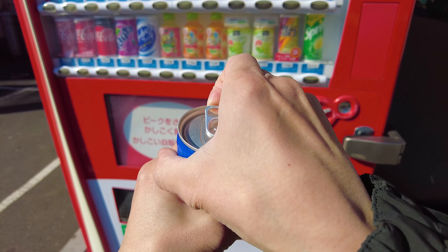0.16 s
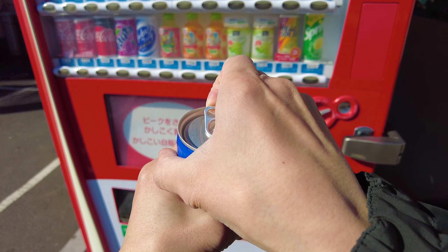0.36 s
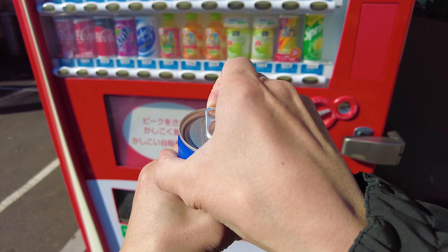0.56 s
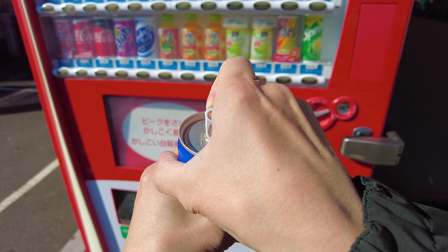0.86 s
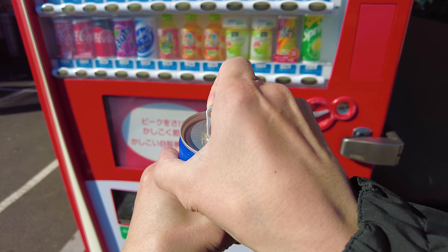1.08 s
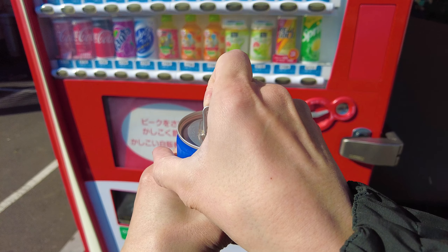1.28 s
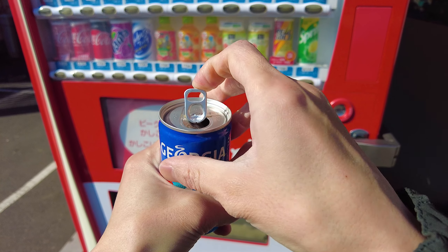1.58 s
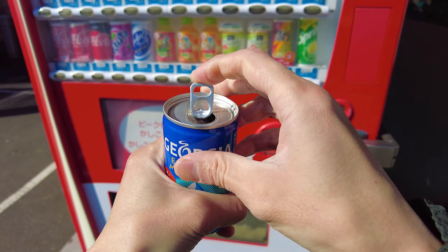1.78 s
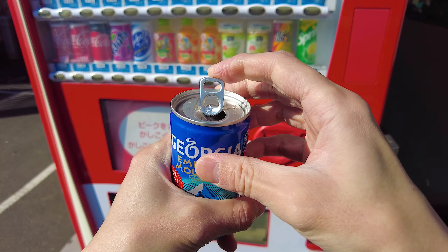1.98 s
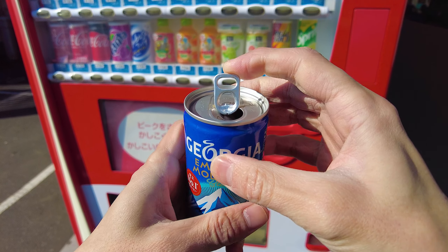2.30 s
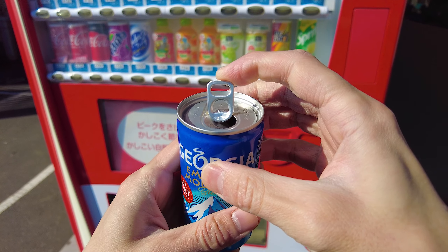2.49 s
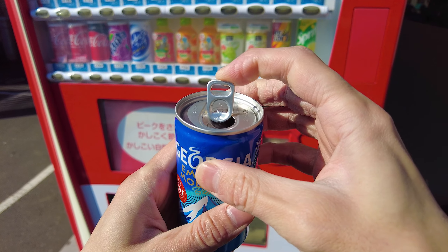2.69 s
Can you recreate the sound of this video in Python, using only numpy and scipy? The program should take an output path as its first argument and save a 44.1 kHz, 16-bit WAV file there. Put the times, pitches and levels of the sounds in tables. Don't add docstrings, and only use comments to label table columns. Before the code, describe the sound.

Close can opening: crisp seal crack, popping lid tear, tab clicks, over low wind rumble

```python
import sys
import numpy as np
from scipy import signal
from scipy.fft import rfft, irfft
from scipy.io import wavfile
from scipy.ndimage import uniform_filter1d

SR = 44100
rng = np.random.default_rng(int(sys.argv[2]) if len(sys.argv) > 2 else 0)


def gain_from_db(level_db):
    decades = np.asarray(level_db, float) / 20
    return 10 ** decades


def output_pcm(signal):
    pcm = np.clip(np.atleast_2d(signal).T, -1, 1) * 32767
    wavfile.write(sys.argv[1], SR, np.round(pcm).astype(np.int16))


N = 125685

# freq_hz, level_db (per Hz)
TRAFFIC_COLOUR = [(88, -40), (150, -13.5), (274, -6.5), (335, -20), (409, -8), (449, -12.5), (524, -15),
                  (6000, -44), (7800, -79.5), (13200, -120)]
# freq_hz, level_db (per Hz)
RUMBLE_COLOUR = [(8.8, -38.5), (15, 1.5), (32, 2.5), (44, -3), (85, -10), (172, -26.5), (200, -27),
                 (260, -56.5), (440, -120)]
# time_s, level_db
GUST_LEVELS = [(0.0, -43), (.12, -40), (.68, -44), (.78, -38), (1.1, -38), (1.2, -43), (1.35, -39),
               (1.45, -42), (1.6, -39), (1.75, -44), (2.1, -42), (2.32, -38), (2.85, -42)]
# centre_hz, width_hz, level_db
FAN = (262, 40, -67)
# freq_hz, level_db (per Hz)
HISS_COLOUR = [(3000, -6), (6000, 0), (10000, -4), (13500, -1), (15750, -2.5), (15950, -40.5)]
# freq_hz, likeness (0 to 1)
LIKENESS = [(60, 1), (200, 0.91), (350, .78), (550, 0.54), (1150, 0.53), (1800, .5), (3000, .2),
            (6000, 0.49), (15000, .55)]
# freq_hz, lead_rad
LEFT_LEAD = [(250, 0), (400, -.55), (700, -1.8), (1000, -3.1), (1140, -3.4), (1220, -6.2), (3000, -6.4),
             (16700, -6.2)]
TRAFFIC_DB, HISS_DB = -57, -75

# freq_hz, t60_s
YARD_DECAY = [(500, 0.28), (1500, 0.21), (4000, 0.89), (16000, 0.29)]
YARD_DB = -23

# start_s, length_s, level_db, centre_hz, width_octaves
RUBS = [(0.01, 0.51, -69.5, 7400, 0.91), (0.44, 0.58, -71, 2670, 1.9), (1.432, 0.22, -67.5, 2600, 2.5),
        (.706, .015, -58, 6000, 1.1), (1.138, .027, -58, 5500, 1.1), (1.709, 0.08, -75, 4350, 0.25),
        (1.707, 0.07, -77, 8000, 0.15), (1.842, 0.093, -74.5, 4200, 0.4), (2.137, .12, -62, 2900, 0.52),
        (1.9, 0.21, -72.5, 5100, 1.2), (1.3, 1.38, -67.5, 1350, 0.18), (1.44, 1.1, -69.5, 2100, 1.14)]
STROKE_S, SHORT, LONG = .3, SR // 2, SR + SR // 2

# start_s, hold_s, level_db, fade_db_per_s
PUFFS = [
    (0.726, 0.012, -34, 700.5),
    (0.748, 0.033, -54.5, 135),
    (1.166, 0.019, -36.5, 902),
    (1.189, 0.041, -50.5, 96),
]
# freq_hz, level_db (per Hz)
JET_COLOUR = [(350, -63), (600, -36), (1790, -0.5), (2800, -4.5), (4420, -1.5), (7180, -6), (14800, -7.5),
              (16500, -28)]
LEAK_COLOUR = [(350, -46.5), (600, -22.5), (1500, -3.5), (4000, -4.5), (7000, -7), (11000, -13),
               (15500, -12.5), (16500, -43)]
SIGH_COLOUR = [(350, -46.5), (600, -20), (1070, -0.5), (1380, -9), (5670, -9.5), (8480, -21.5),
               (15200, -21), (16500, -43)]

# start_s, peak_db, tearing_ms, left_minus_right_db
SEAL_CRACKS = [
    (0.7207, -6.5, .7, 0.5),
    (.7214, -16, .6, 1.5),
    (0.7235, -25, .8, 0),
    (.7262, -28, .8, 0),
    (0.7283, -19.5, 1.2, 0),
    (.768, -41.5, 1.5, -1),
    (1.0651, -45, .4, 0),
    (1.1358, -32.5, 1.2, -0.5),
    (1.138, -32, 1.2, 0.5),
    (2.208, -51.5, .8, 2),
]
LID_TEARS = [
    (1.1640, -21.5, 1.1, 1),
    (1.1672, -23, 1.8, 0.89),
    (1.1705, -4.5, 0.58, 0.98),
    (1.1716, -16.5, .8, 0.86),
    (1.181, -27.5, 1.2, 1),
    (1.182, -25.5, 2.5, 0.92),
]
TAB_FOLDS = [
    (1.433, -30, 1.2, 0.45),
    (1.4564, -13, 0.24, 1.5),
    (1.4576, -21, 0.95, 1.5),
    (1.4596, -22.5, 1.5, 2),
]
TAB_PRESSES = [
    (1.543, -27.5, .5, .7),
    (1.5440, -18, 0.73, .7),
    (1.5457, -26.5, 1.7, .7),
]
WALL_TAPS = [
    (2.1023, -9.5, 0.27, .1),
    (2.1065, -25.5, 1, .1),
]
HOLLOW_POPS = [
    (1.1555, -42, 2.5, 1),
    (1.1610, -37, 2.5, 1),
    (1.1702, -15, .3, 1),
    (1.1815, -33, .5, 1),
]
# freq_hz, level_db, t60_s
SEAL_MODES = [(1869, -14, .008), (2500, -19, .004), (3280, -10, .005), (4203, -2, 0.0052),
              (4616, -6.5, 0.0057), (5590, -1, 0.0047), (6600, -6, 0.0033), (7690, -2, 0.005),
              (9120, -4, 0.0052), (10530, -9, 0.0034), (12980, -7, .004)]
LID_MODES = [(490, -24, 0.0077), (1360, -8, 0.016), (1840, -6.5, .008), (2830, -12, .01), (3573, -5, .019),
             (4450, -5.5, 0.017), (5070, -2, 0.01), (5775, -8, 0.014), (6650, -10, 0.009),
             (7550, -12.5, .008), (9000, -6.5, .008), (10950, -17, 0.0069)]
TAB_MODES = [(1226, 0, 0.032), (1620, -9, 0.017), (1850, -4, 0.011), (2180, -4.5, 0.013),
             (2560, -16.5, 0.015), (2910, -11.5, 0.016), (3300, -11, 0.02), (3780, -14, 0.018),
             (4200, -20, .012), (4600, -15, 0.016), (5080, -22.5, 0.0098), (6370, -25.5, 0.014),
             (7580, -21, 0.0075)]
PRESSED_MODES = [(534, -14, 0.019), (1237, -1, 0.04), (1570, 0.5, 0.011), (2030, -2, 0.016),
                 (2680, -23, 0.013), (3020, -11, 0.025), (3650, -7, 0.014), (4200, -6, 0.016),
                 (4600, -2.5, 0.027), (5110, -10, 0.016), (5780, -19, 0.013), (7600, -11, 0.017),
                 (8770, -13, 0.014)]
WALL_MODES = [(606, -17, 0.027), (1163, -2, 0.033), (1502, 1.5, 0.024), (1766, -0.5, 0.025),
              (2055, -4, 0.019), (2850, -12.5, 0.023), (3240, -18, .012), (3770, -11, 0.024),
              (4290, -20, 0.014), (4540, -13.5, 0.02), (5520, -12.5, 0.0099), (6460, -16.5, 0.016)]
HOLLOW_MODES = [(1081, -.5, .024), (1190, -14, .02)]
# freq_hz, level_db (per Hz)
SEAL_SNAP = [(290, -50), (500, -26), (1300, -17), (4000, -2), (7590, -0.5), (13100, -6), (16800, -19)]
LID_SNAP = [(88, -35), (150, -14.5), (500, -10), (820, -27), (2520, -15.5), (4840, 1.5), (15500, -16),
            (16800, -32)]
TAB_SNAP = [(240, -39), (800, -31), (1610, -11), (4500, -15), (11500, -27), (13100, -23), (16800, -50)]
PRESS_SNAP = [(240, -32), (800, -39), (1800, -5), (4660, -9), (14600, -30), (16800, -53)]
WALL_SNAP = [(240, -50), (500, -17), (850, -7), (1850, -9), (2910, -14), (13500, -30), (16800, -61)]
POP_SNAP = [(60, -20), (150, -3), (500, -1), (1500, -12), (4000, -40)]
CRACK_LEVELS = [
    0,
    -1,
    -11,
    -9,
    -7.5,
    -17,
]
# freq_hz, side_minus_mid_db
WIDTH = [(60, -29.5), (300, -14.5), (850, -4), (1400, -15.5), (3000, -9), (8000, -7), (15000, -3.5)]
SCATTER, APART = .32, .55
THIN_HZ = 420
SHADE_HZ, SHADE_Q = 810, 4.2
EDGE_HZ = 16700


def evened(x):
    return x / np.sqrt(np.mean(x ** 2) + 1e-20)


def read(points, hz):
    f, value = np.transpose(points)
    return np.interp(np.log(hz + 1), np.log(f + 1), value)


def band(table, fall_db=40):
    (low_hz, low_db), (high_hz, high_db) = table[0], table[-1]
    points = [(low_hz / 2, low_db - fall_db), *table, (high_hz * 1.2, high_db - fall_db)]
    return lambda hz: read(points, hz)


def causal(shape_db):
    hz = abs(np.fft.fftfreq(2048, 1 / SR))
    level = np.log(gain_from_db(np.maximum(shape_db(hz), -90)))
    return np.fft.ifft(np.exp(level - 1j * signal.hilbert(level).imag)).real[:1024]


def noise(shape_db, same, size, patchy_db, lead=lambda hz: 0 * hz, count=N):
    hop, hz = size // 4, np.fft.rfftfreq(size, 1 / SR)
    a, b, c, d, patches = rng.standard_normal((count // hop + 5, len(hz), 5)).T
    patches = uniform_filter1d(patches, size=8, axis=0)
    patches = evened(uniform_filter1d(patches, size=10, axis=1))
    alike = np.clip(same(hz), -1, 1)[:, None]
    shared, apart = a + 1j * b, c + 1j * d
    left = shared * np.exp(1j * lead(hz))[:, None]
    right = alike * shared + np.sqrt(1 - alike ** 2) * apart
    z = np.array([left, right]) * gain_from_db(shape_db(hz)[:, None] + patchy_db * patches)
    return evened(signal.istft(z, nperseg=size, noverlap=size - hop)[1][:, :count])


def street():
    same, lead = lambda hz: read(LIKENESS, hz), lambda hz: read(LEFT_LEAD, hz)
    traffic = gain_from_db(TRAFFIC_DB) * noise(band(TRAFFIC_COLOUR, 15), same, size=1024, patchy_db=2.0, lead=lead)
    fan_hz, fan_width_hz, fan_db = FAN
    fan_colour = lambda hz: -6 * np.minimum(((hz - fan_hz) / fan_width_hz) ** 2, 15)
    fan = gain_from_db(fan_db) * noise(fan_colour, same, size=2048, patchy_db=3.5, lead=lead)
    hiss = gain_from_db(HISS_DB) * noise(lambda hz: read(HISS_COLOUR, hz), same, size=256, patchy_db=1.6)
    gusts = gain_from_db(np.interp(np.arange(N) / SR, *np.transpose(GUST_LEVELS)))
    rumble = gusts * noise(band(RUMBLE_COLOUR), same, size=4096, patchy_db=2.5)
    return traffic + hiss + fan + rumble


def yard(x):
    taps = np.zeros((2, SR // 2))
    grid = np.arange(400, SR // 2 - 20, 20)
    at = grid + rng.integers(0, 20, (2, len(grid)))
    np.put_along_axis(taps, at, rng.choice([-1., 1.], at.shape), 1)
    hz, t, z = signal.stft(taps, SR, nperseg=256)
    fading = z * gain_from_db(-60 * t / read(YARD_DECAY, hz)[:, None])
    tail = signal.istft(fading, SR, nperseg=256)[1]
    return signal.fftconvolve(x[None], tail / np.linalg.norm(tail[0]), axes=1)[:, :N]


def rustle():
    out = np.zeros((2, N + LONG))
    for s, length, db, centre_hz, octaves in RUBS:
        span = LONG if length > STROKE_S else SHORT
        at = round(abs(s) * SR)
        progress = np.minimum(np.arange(span) / SR / length, 1)
        stroke = abs(np.sin(np.pi * progress ** 0.62)) ** 0.42
        colour = lambda hz: -6 * (np.log2((hz + 1) / centre_hz) / octaves) ** 2
        grain = noise(colour, lambda hz: 0.61 + 0 * hz, size=256, patchy_db=1.0, count=span)
        out[:, at:at + span] += gain_from_db(db) * stroke * grain
    return out[:, :N]


def air():
    t, out = np.arange(SHORT) / SR, np.zeros((2, N))
    colours = [JET_COLOUR, LEAK_COLOUR, JET_COLOUR, SIGH_COLOUR]
    for (s, hold, db, fade_db), colour in zip(PUFFS, colours):
        shape = np.minimum(t / 0.0012, 1) * gain_from_db(db - fade_db * np.maximum(t - hold, 0))
        rush = noise(band(colour), lambda hz: 0.56 + 0 * hz, size=256, patchy_db=2.0, count=SHORT)
        at = round(s * SR)
        out[:, at:at + SHORT] += shape * rush
    return out


def ringing(modes):
    t, ring = np.arange(3000) / SR, 0
    for k, (hz, db, t60) in enumerate(modes):
        ring = ring + (-1) ** k * gain_from_db(db - 60 * t / min(t60, .029)) * np.sin(2 * np.pi * hz * t)
    return signal.sosfilt(signal.butter(2, THIN_HZ, "high", fs=SR, output="sos"), ring)


def tearing(ms):
    u = np.arange(500) / SR * 1000 / ms
    slips = rng.standard_normal((4, 500)) * np.minimum(u / 0.073, 1) * np.exp(-u) / np.sqrt(ms * SR / 1000)
    slips[::2] *= SCATTER
    slips[:2, 4] += .7
    return slips


def spread(sound):
    wide = gain_from_db(read(WIDTH, np.fft.rfftfreq(4096, 1 / SR)))
    lead_in = 200
    mid, other = rfft(np.pad(sound, [(0, 0), (lead_in, 0)]), 4096)
    side = irfft(wide * (1j * mid + APART * other))[lead_in:lead_in + len(sound[0])]
    shaded = signal.lfilter(*signal.iirnotch(SHADE_HZ, SHADE_Q, SR), sound[0])
    return shaded + np.outer([1, -1], side)


def struck(blows, modes, snap, crack_db):
    out = np.zeros((3, N))
    ring, crack = ringing(modes), causal(band(snap))
    for s, db, ms, pan_db in blows:
        slips = tearing(ms)
        rung = signal.fftconvolve(slips[::2], ring[None], axes=1)
        dry = signal.fftconvolve(slips[1::2], crack[None], axes=1)
        sound = rung / abs(rung[0]).max()
        dry = dry / abs(dry).max()
        sound[:, :dry.shape[1]] += gain_from_db(crack_db) * dry
        at = round(s * SR)
        levels = gain_from_db(db + pan_db * np.array([[.5], [-.5]]))
        out[:2, at:at + sound.shape[1]] += levels * spread(sound)
        out[2, at:at + dry.shape[1]] += gain_from_db(db) * dry[0]
    return out


def opened_can():
    blows = [SEAL_CRACKS, LID_TEARS, TAB_FOLDS, TAB_PRESSES, WALL_TAPS, HOLLOW_POPS]
    modes = [SEAL_MODES, LID_MODES, TAB_MODES, PRESSED_MODES, WALL_MODES, HOLLOW_MODES]
    snaps = [SEAL_SNAP, LID_SNAP, TAB_SNAP, PRESS_SNAP, WALL_SNAP, POP_SNAP]
    return sum(struck(*part) for part in zip(blows, modes, snaps, CRACK_LEVELS))


def scene():
    can = opened_can()
    return can[:2] + gain_from_db(YARD_DB) * yard(can[2]) + air() + rustle() + street()


def band_limit(x):
    return signal.sosfilt(signal.butter(12, 17160, fs=SR, output="sos"), x)


def record(dry):
    mix = signal.oaconvolve(dry, signal.firwin(511, EDGE_HZ, fs=SR)[None], "same")
    return band_limit(mix)


dry = scene()
out = record(dry)
output_pcm(out)
```